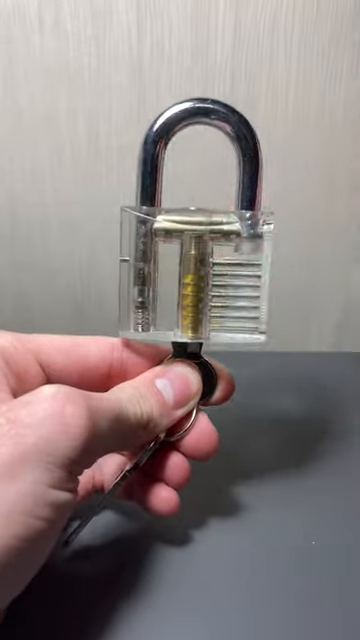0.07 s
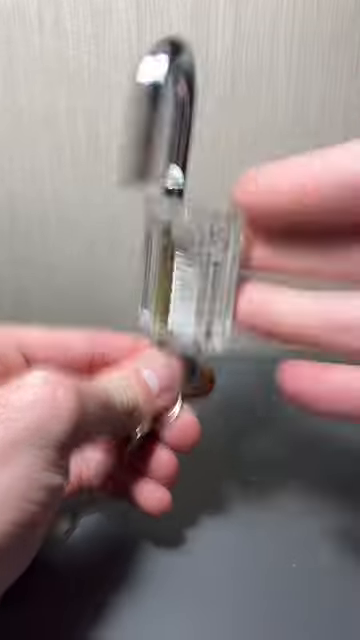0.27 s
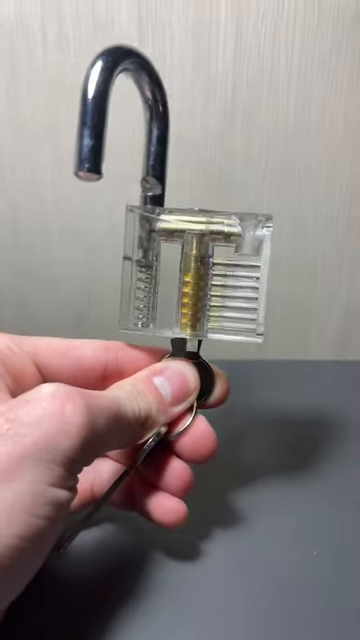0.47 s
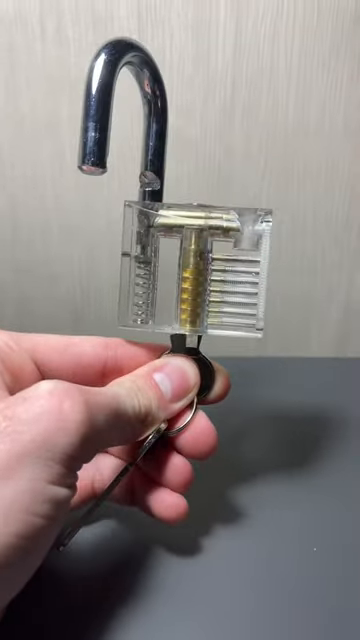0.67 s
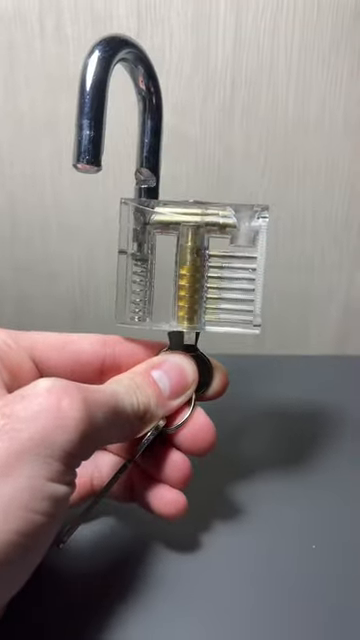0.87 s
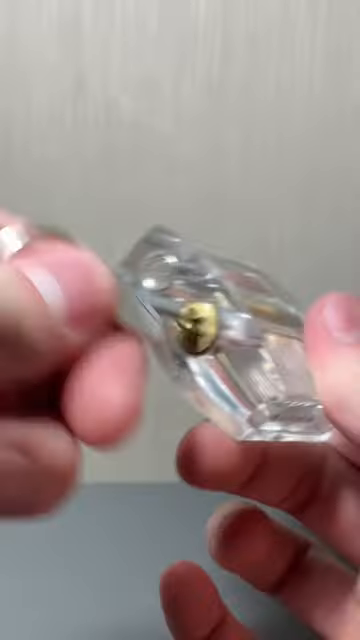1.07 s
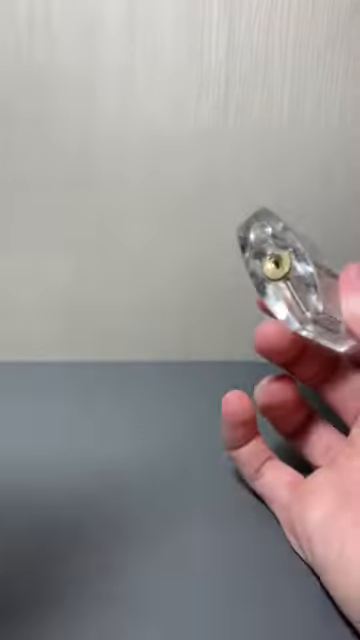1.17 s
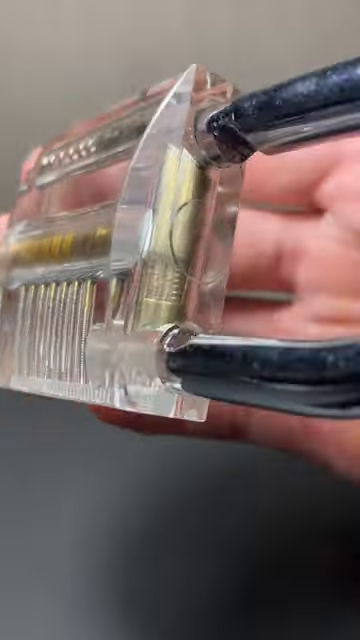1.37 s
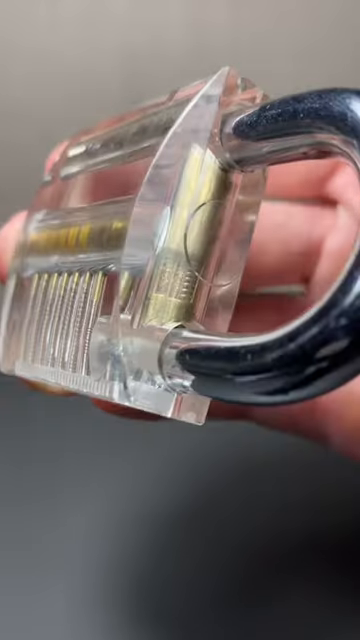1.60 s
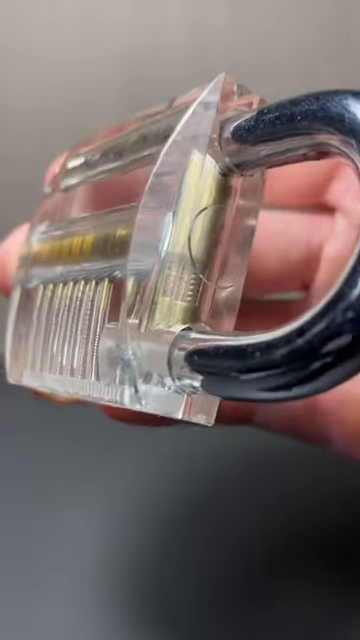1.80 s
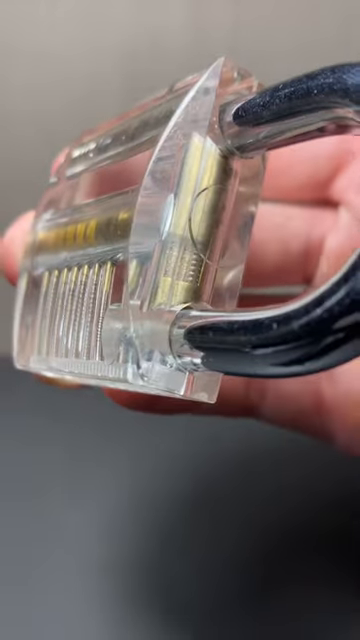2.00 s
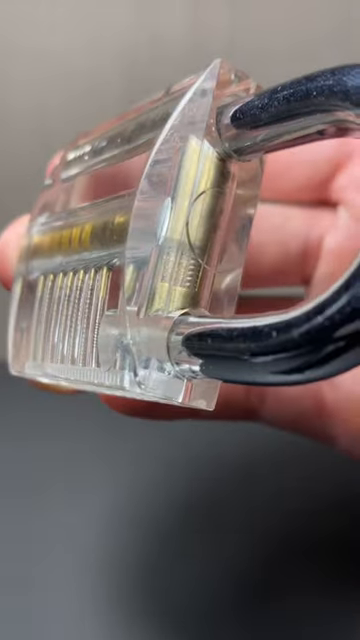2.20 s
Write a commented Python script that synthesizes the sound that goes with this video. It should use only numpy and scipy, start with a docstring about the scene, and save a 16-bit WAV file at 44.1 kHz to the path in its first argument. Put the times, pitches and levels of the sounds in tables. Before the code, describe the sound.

Sharp metallic padlock clicks up close: springing open, a brief key rattle, then clicking shut.

```python
"""Plastic padlock, close up

A clear plastic padlock is handled close to a pair of microphone ports in a small, quiet room.
Its steel shackle springs open, the key rattles in the brass cylinder, and the shackle is pressed
home in two clicks. Each snap also thumps the hand that holds the lock. Two dull knocks sound
further off, and a low hum lies underneath."""
import sys
import numpy as np
from scipy import signal
from scipy.fft import rfft, irfft, next_fast_len
from scipy.io import wavfile
from scipy.ndimage import uniform_filter1d

SR = 44100
rng = np.random.default_rng(int(sys.argv[2]) if len(sys.argv) > 2 else 0)


def persist_wave(psi):
    """Save psi, clipped to +-1, as 16-bit WAV."""
    counts = np.round(np.clip(psi, -1, 1) * 32767).astype(np.int16)
    wavfile.write(sys.argv[1], SR, np.atleast_2d(counts).T)


N = 99225

# shackle and bolt strike the lock body: start_s, level_db, t60_s, treble_db, bass_db, ring_db
SHACKLE_STRIKES = [(0.142, -42, 0.016, -6, -2, -25.5), (.994, -59, 0.021, -5, -7, -35),
                   (0.1993, -26, 0.019, -17, -3.5, -13), (0.2074, -11, 0.026, -6.5, -0.5, -21.5),
                   (0.2088, -9.5, 0.027, 0, 2.5, -20), (0.2318, -9, 0.026, 0, -2.5, -20.5),
                   (0.2334, -8.5, 0.008, 6, -4, -24), (0.2374, -21, .01, 2.5, -4.5, -25),
                   (0.2894, -42.5, .02, 10.5, -6, -26), (0.3008, -24, 0.02, -10.5, 6, -27),
                   (1.455, -38.5, 0.016, -27, 11, -31), (1.4794, -42, 0.068, -11, 4, -28),
                   (1.4828, -27.5, 0.064, -12.5, 7, -27), (1.4873, -15, 0.011, 12, 1, -38),
                   (1.489, -19, 0.028, 0, 5.5, -33.5), (1.5662, -37.5, 0.041, -8.5, 9, -32),
                   (1.5701, -19.5, 0.014, -12, 1, -26.5), (1.5755, -20, 0.0087, -9, 2, -29.5),
                   (1.5766, -11.5, 0.012, 7, -6.5, -33.5), (1.5788, -8, 0.0064, 2.5, -6, -35),
                   (1.5807, -8.5, 0.017, -6.5, 2.5, -38.5), (1.9496, -45, 0.011, -4, -14, -21),
                   (1.9618, -46, 0.012, -3, -16, -28)]
# the key ticks over the pins: start_s, level_db, t60_s
PIN_TICKS = [(1.006, -70, .02), (1.053, -42, .04), (1.058, -33.5, 0.024), (1.0605, -21.5, .015),
             (1.0641, -20, .008), (1.0694, -26.5, .03), (1.0743, -19, .02), (1.0776, -22.5, .02),
             (1.0808, -9, .007), (1.086, -10, 0.0093), (1.0919, -20, .02), (1.097, -21.5, .014)]
# metal slides before it catches: start_s, end_s, end_level_db, rise_db, treble_db
METAL_SLIDES = [(.145, .19, -59.5, 2, -8), (.186, 0.209, -36.5, 6.5, -16), (.213, .232, -25.5, 5, 5.5),
                (1.059, 1.103, -40.5, 10, 1.5), (1.465, 1.489, -43, 13.5, -4)]
# the lock jolts in the hand: start_s, level_db, pitch_hz, t60_s, left_over_right_db, left_lead_rad
HAND_THUMPS = [(.214, -23, 95.3, 0.21, 3.5, 1.7), (0.239, -17.5, 65, 0.14, 2, 2.46),
               (1.076, -30, 134.8, 0.12, 2, 1), (1.493, -32.5, 86.4, 0.13, 1, .3),
               (1.58, -18, 288, 0.016, -11, 0), (1.582, -28.5, 113.7, 0.066, -4, 0)]
# knocks further off: start_s, level_db, t60_s, treble_db
FAR_KNOCKS = [(.549, -68, 0.15, 23), (0.729, -39, 0.27, -1), (.79, -44, 0.15, -17)]
# ring of the steel parts: pitch_hz, level_db, t60_s
STEEL_MODES = [(1174, 4, 0.015), (1360, -13, .04), (1780, -7.5, .04), (2117, -4, 0.12), (2484, -1, 0.07),
               (2760, -3.5, .035), (3220, -9, .04), (3990, -4, 0.026), (4660, -0.5, 0.087),
               (5610, -3, 0.084), (9090, -3, 0.028), (10090, -4.5, 0.035), (12286, -11.5, .05)]
# ring of key and cylinder: pitch_hz, level_db, t60_s
BRASS_MODES = [(1902, -7.5, 0.034), (5825, -6, 0.016), (8960, -1, .03), (9870, -4.5, 0.033),
               (9800, -2.5, 0.031), (11720, -3, 0.058), (12700, -8, 0.034), (15300, -12, .03)]
# crack of the plastic body: frequency_hz, level_db
BODY_COLOUR = [(100, -11.5), (400, -6), (850, -11), (1300, 2), (2700, 0.5), (4000, 1.5), (5500, 4),
               (7400, -12), (9800, 4), (11500, -2.5), (13500, -10), (15400, -7), (16200, -22.5)]
# what the palm does to that crack: frequency_hz, gain_db
PALM_COLOUR = [(100, -2.5), (350, 2), (750, -2.5), (1300, -3), (2150, 6), (3200, 3), (4600, -1), (5700, 0),
               (7500, -0.5), (12000, 0), (16000, 3.5)]
# crack of the key on a pin: frequency_hz, level_db
KEY_COLOUR = [(150, -12), (600, -25), (1100, -11.5), (1800, -8.5), (3500, -13), (6000, -7), (7500, -11),
              (9300, 6.5), (10800, -1), (12000, 2.5), (13500, -8.5), (15500, -4), (16100, -34)]
# sliding metal: frequency_hz, level_db
SCRAPE_COLOUR = [(100, -2.5), (400, -8.5), (650, 2.5), (1000, -7.5), (2800, -1.5), (5500, -7), (7500, -19),
                 (10000, -10.5), (16000, -28)]
# a hollow knock: frequency_hz, level_db
KNOCK_COLOUR = [(30, -3), (75, 11), (160, -4), (400, -11.5), (630, 0.5), (950, -17.5), (1800, -18.5),
                (2700, -26), (5000, -48.5), (12000, -81)]
# phase between the microphone ports: frequency_hz, left_lead_rad
PORT_LEAD = [(50, -0.5), (350, 0.27), (650, 1), (1500, 1.5), (2900, 1), (5000, -0.73), (7300, 2.5),
             (10400, 7.5), (13600, 7.5), (16000, 14.5)]
# part of a click that differs between the ports: frequency_hz, power_share
PORT_DIFFERENCE = [(500, 0.1), (1500, 0.59), (4000, 0.33), (6000, .25), (9000, 0.055), (16000, .12)]
# room sound as the lock comes closer to the microphone: time_s, tail_db, early_db
ROOM_SENDS = [(.3, -13, -12), (1.08, -13, -25.5), (1.49, -14.5, -27), (1.58, -18.5, -12), (1.95, -15, -7.5)]
# decay of the room's tail: frequency_hz, t60_s
TAIL_DECAY = [(60, .3), (130, 0.33), (300, .36), (600, 0.4), (1500, 0.35), (5000, 0.32), (10000, 0.37),
              (16000, 0.27)]
# tone of the reflections: frequency_hz, gain_db
REFLECTION_COLOUR = [(60, 1.5), (300, 2), (700, 3.5), (2000, -2.5), (5000, -0.5), (9000, -8.5), (16000, -4)]
# the room's low modes: frequency_hz, level_db
BOOM_COLOUR = [(35, -25.5), (50, -10.5), (62, 1), (85, -12), (112, -6), (128, 0), (150, -20.5),
               (260, -23.5), (288, -7.5), (315, -26.5), (600, -46), (2000, -93)]
# steps in the room tone: start_s, rumble_db, hum_db
ROOM_TONE_STEPS = [(0, -70.5, -80.5), (0.219, -61, -79), (.7, -66.5, -94), (0.97, -55, -50.5),
                   (1.393, -66, -59.5)]
# room rumble: frequency_hz, level_db
RUMBLE_COLOUR = [(20, -17), (60, 6), (110, -3), (170, -17.5), (290, -15.5), (450, -29), (1000, -41.5),
                 (3000, -54), (16000, -82)]
# low hum: harmonic_number, level_db
HUM_HARMONICS = [(1, -1.5), (2, -6.5), (3, -33.5), (4, -29.5)]
# faint hiss: frequency_hz, level_db
HISS_COLOUR = [(100, 0), (1000, -1), (4000, -1.5), (9000, -10.5), (16000, -22.5)]


def amp(db):
    """Decibels to gain."""
    return 10 ** (np.asarray(db) / 20)


def unit(x):
    """Scale to rms 1."""
    return x / np.sqrt(np.mean(x ** 2) + 1e-20)


def along(points, hz):
    """Read (frequency, value) points on a log axis."""
    frequencies, values = np.transpose(points)
    return np.interp(np.log(hz + 1), np.log(frequencies + 1), values)


def filtered(x, response):
    """Apply a gain given as a function of frequency."""
    n = x.shape[-1]
    padded = next_fast_len(n + 8192)
    return irfft(rfft(x, padded) * response(np.fft.rfftfreq(padded, 1 / SR)), padded)[..., :n]


def coloured(x, colour):
    """Shape x with a curve of decibels over frequency."""
    return filtered(x, lambda hz: amp(along(colour, hz)))


def shelf(x, treble_db, corner_hz):
    """Lift or dull the treble."""
    return filtered(x, lambda hz: amp(treble_db * hz ** 4 / (hz ** 4 + corner_hz ** 4)))


def noise(colour, n):
    """Two unrelated coloured noises of rms 1."""
    return unit(coloured(rng.standard_normal((2, n)), colour))


def fade(t, t60_s, rise_s):
    """Quick rise, exponential decay."""
    return amp(-60 * t / t60_s) * (1 - np.exp(-t / rise_s))


def add(out, start_s, x):
    """Mix x in at start_s."""
    i = round(start_s * SR)
    n = min(x.shape[-1], N - i)
    out[:, i:i + n] += x[..., :n]


def contact(colour, t60_s, modes, ring_db, rise_s=.00018, longest_ring_t60_s=.06):
    """One hard contact: a crack of dense, damped resonances and a short metal ring."""
    t = np.arange(SR // 5) / SR
    share = lambda hz: np.clip(along(PORT_DIFFERENCE, hz), 0, 1)
    mid, side = filtered(noise(colour, len(t)), lambda hz: np.sqrt([1 - share(hz), share(hz)]))
    envelope = fade(t, t60_s, rise_s)
    crack = np.array([mid + side, mid - side]) * envelope
    crack *= np.sqrt(np.sum(envelope ** 2) / np.sum(crack ** 2, axis=1, keepdims=True))
    ring = np.zeros(len(t))
    for hz, db, mode_t60_s in modes:
        strength = amp(db + rng.normal(0, 1.5))  # no two strikes are alike
        decay = fade(t, min(mode_t60_s, longest_ring_t60_s), rise_s)
        ring += strength * decay * np.sin(2 * np.pi * (hz * t + rng.random()))
    return crack + amp(ring_db) * ring


def shackle(in_palm_from_s=1.4):
    """Shackle and bolt snap against the plastic body; the steel rings most when it springs free."""
    out = np.zeros((2, N))
    for start_s, db, t60_s, treble_db, bass_db, ring_db in SHACKLE_STRIKES:
        clack = contact(BODY_COLOUR, t60_s, STEEL_MODES, ring_db)
        clack = shelf(clack, treble_db, corner_hz=7240)
        if start_s > in_palm_from_s:
            clack = coloured(clack, PALM_COLOUR)
        clack = amp(bass_db) * shelf(clack, -bass_db, corner_hz=900)  # bass shelf
        add(out, start_s, amp(db) * clack)
    return out


def key():
    """A quick run of bright ticks as the key passes the pins."""
    out = np.zeros((2, N))
    for start_s, db, t60_s in PIN_TICKS:
        add(out, start_s, amp(db) * contact(KEY_COLOUR, t60_s, BRASS_MODES, ring_db=-15))
    return out


def metal_slides():
    """Grainy friction that swells until the part catches."""
    out = np.zeros((2, N))
    for start_s, end_s, db, rise_db, treble_db in METAL_SLIDES:
        n = max(int((end_s - start_s) * SR), 64)
        roughness = unit(uniform_filter1d(rng.standard_normal(n), size=40))
        grain = unit(amp(1.5 * roughness))
        swell = amp(db + np.linspace(-rise_db, 0, n)) * signal.windows.tukey(n, .2)
        rub = swell * grain * noise(SCRAPE_COLOUR, n)
        add(out, start_s, shelf(rub, treble_db, corner_hz=5060))
    return out


def thin_ring(start_s=1.086, cut_s=1.3915, pitch_hz=1663):
    """A thin ring follows the key's rattle; a cut in the sound stops it with a faint click."""
    out, t = np.zeros((2, N)), np.arange(round((cut_s - start_s) * SR)) / SR
    envelope = amp(-59.5) * fade(t, t60_s=.74, rise_s=.002)
    add(out, start_s, envelope * np.sin(2 * np.pi * pitch_hz * t))
    cut_click = amp(-44.5) * np.exp(-t / .0006)
    add(out, cut_s, shelf(cut_click, treble_db=-19, corner_hz=8010))
    return out


def hand_thumps(sag_share=.1):
    """The lock's recoil, damped by the hand; the pitch sags as it dies."""
    out, t = np.zeros((2, N)), np.arange(SR // 2) / SR
    sides = np.array([[.5], [-.5]])
    for start_s, db, hz, t60_s, pan_db, lead_rad in HAND_THUMPS:
        pitch_hz = hz * (1 - sag_share * np.minimum(t / t60_s, 1))
        tone = np.sin(2 * np.pi * np.cumsum(pitch_hz) / SR + lead_rad * sides)
        add(out, start_s, amp(db + pan_db * sides) * fade(t, t60_s, rise_s=.001) * tone)
    return out


def microphone_ports(x):
    """Direct sound reaches the two ports out of step."""
    sides = np.array([[.5], [-.5]])
    return filtered(x, lambda hz: np.exp(1j * sides * np.interp(hz, *np.transpose(PORT_LEAD))))


def room_reflections(x, delay_s=.003):
    """Early reflections off table and wall, and a short tail, different at each port."""
    hz, frame_s, spectrum = signal.stft(rng.standard_normal((2, SR * 3 // 4)), SR, nperseg=256)
    decay = amp(-60 * frame_s / along(TAIL_DECAY, hz)[:, None])
    _, tail = signal.istft(spectrum * decay, SR, nperseg=256)
    t = np.arange(tail.shape[1]) / SR
    tail *= 1 - np.exp(-t / .007)
    echoes = rng.standard_normal(tail.shape) ** 3  # cubing makes a few stand out
    early = echoes * fade(t, t60_s=.035, rise_s=.008)
    times_s, tail_db, early_db = np.transpose(ROOM_SENDS)
    wet = np.zeros((2, N))
    for response, db in ((tail, tail_db), (early, early_db)):
        send = x * amp(np.interp(np.arange(N) / SR, times_s, db))
        response = response / np.linalg.norm(response, axis=1, keepdims=True)
        add(wet, delay_s, signal.fftconvolve(send, response, axes=1))
    return coloured(wet, REFLECTION_COLOUR)


def room_boom(start_s=.245, level_db=-29.5):
    """Low room modes build up and hang on after the shackle springs out."""
    out, t = np.zeros((2, N)), np.arange(SR) / SR
    add(out, start_s, amp(level_db) * fade(t, t60_s=.72, rise_s=.044) * noise(BOOM_COLOUR, SR))
    return out


def far_knocks():
    """Two soft, hollow knocks after a much fainter one, well off the microphone: mostly room sound."""
    out, t = np.zeros((2, N)), np.arange(SR // 2) / SR
    for start_s, db, t60_s, treble_db in FAR_KNOCKS:
        hollow = shelf(noise(KNOCK_COLOUR, len(t)), treble_db, corner_hz=1225)
        add(out, start_s, amp(db) * fade(t, t60_s, rise_s=.0046) * hollow)
    return out


def room_tone(hum_hz=49.4, hiss_db=-84):
    """Rumble and a low hum, changing level in steps, with a faint steady hiss."""
    t = np.arange(N) / SR
    starts_s, rumble_db, hum_db = np.transpose(ROOM_TONE_STEPS)
    step = np.searchsorted(starts_s[1:], t)
    level = lambda db: uniform_filter1d(amp(db)[step], size=300)
    hum = unit(sum(amp(db) * np.sin(2 * np.pi * (harmonic * hum_hz * t + rng.random()))
                   for harmonic, db in HUM_HARMONICS))
    mid, side = noise(RUMBLE_COLOUR, N)
    rumble = mid + .6 * np.array([side, -side])
    hiss = amp(hiss_db) * noise(HISS_COLOUR, N)
    return level(rumble_db) * rumble + level(hum_db) * hum + hiss


def scene():
    """The lock close to the microphone, a touch louder on the right, with the room behind it."""
    right_db = .97
    lock = shackle() + key() + metal_slides()
    near = (microphone_ports(lock) + room_reflections(lock)) * amp([[-right_db / 2], [right_db / 2]])
    return near + thin_ring() + hand_thumps() + room_boom() + far_knocks() + room_tone()


def record(dry):
    """The recorder rounds off the highest peaks and keeps nothing above its band limit."""
    ceiling, shoulder_hz, top_hz = .96, 15900, 16600
    rounded = dry / (1 + np.abs(dry / ceiling) ** 6) ** (1 / 6)
    shoulder = lambda hz: .15 + .85 / (1 + (hz / shoulder_hz) ** 200)
    return filtered(rounded, lambda hz: shoulder(hz) / (1 + (hz / top_hz) ** 200))


dry = scene()
out = record(dry)
persist_wave(out)
```